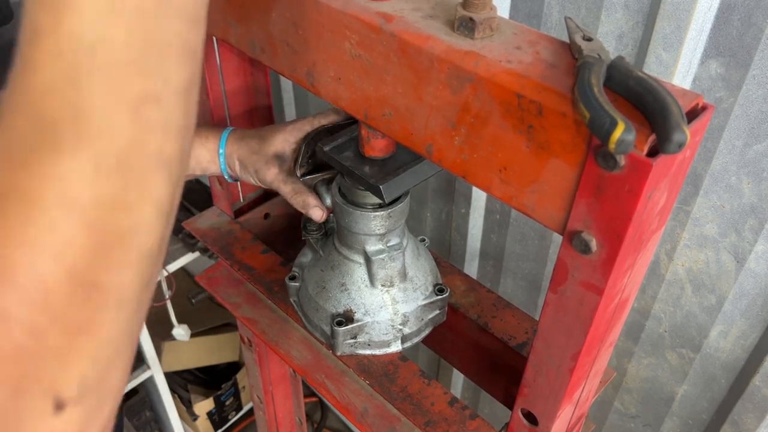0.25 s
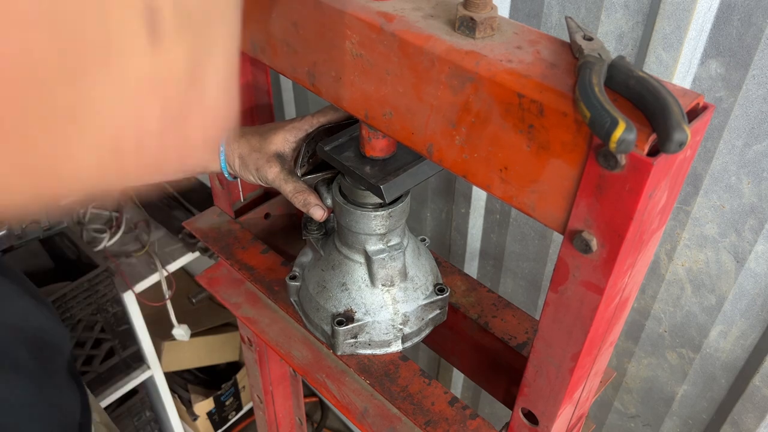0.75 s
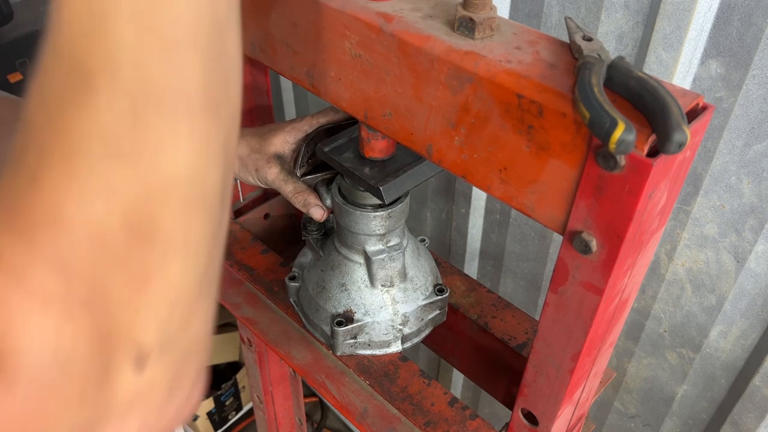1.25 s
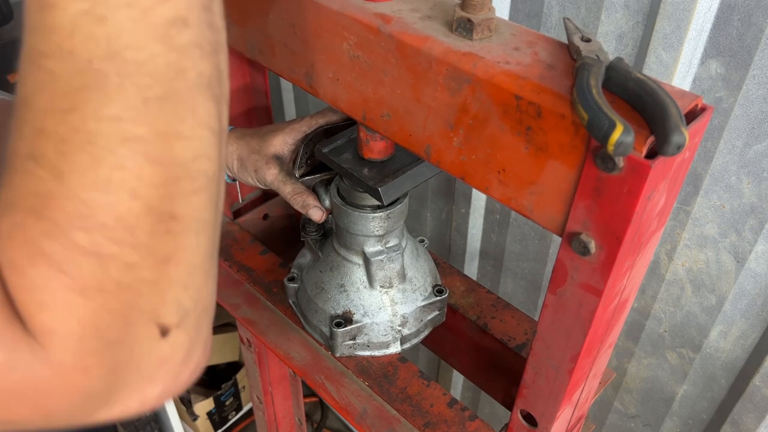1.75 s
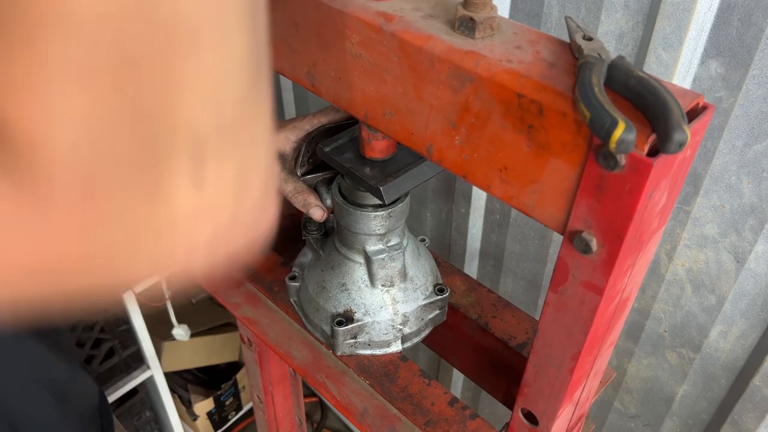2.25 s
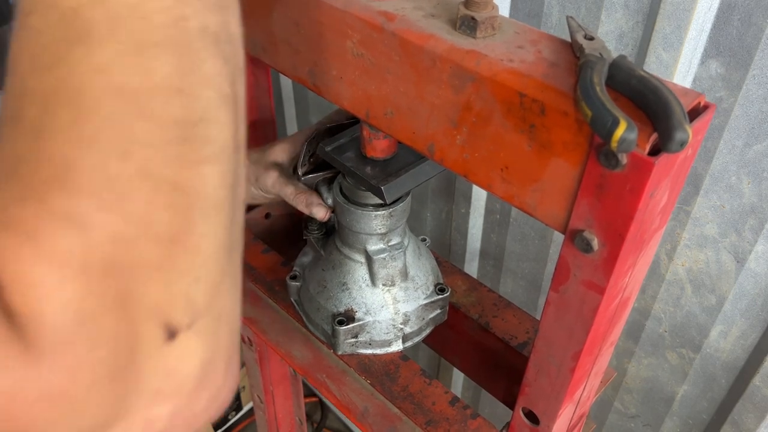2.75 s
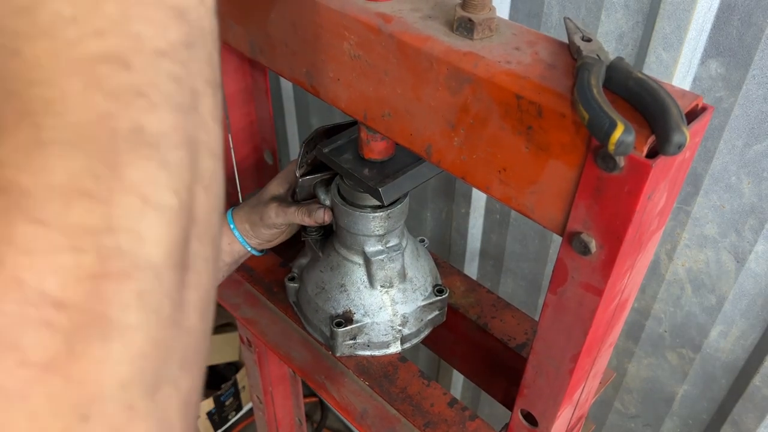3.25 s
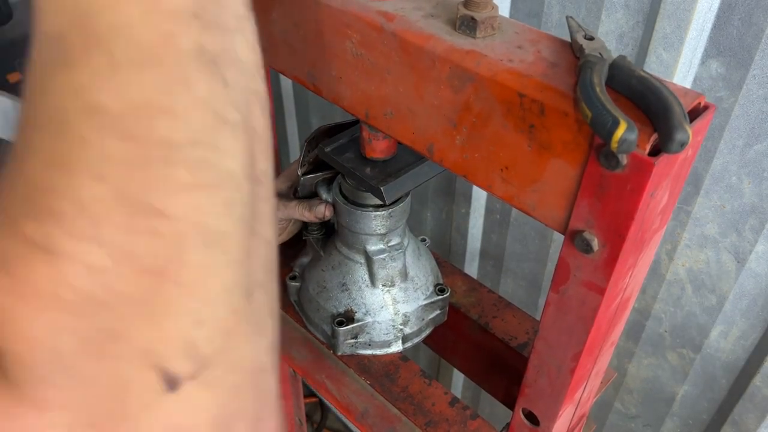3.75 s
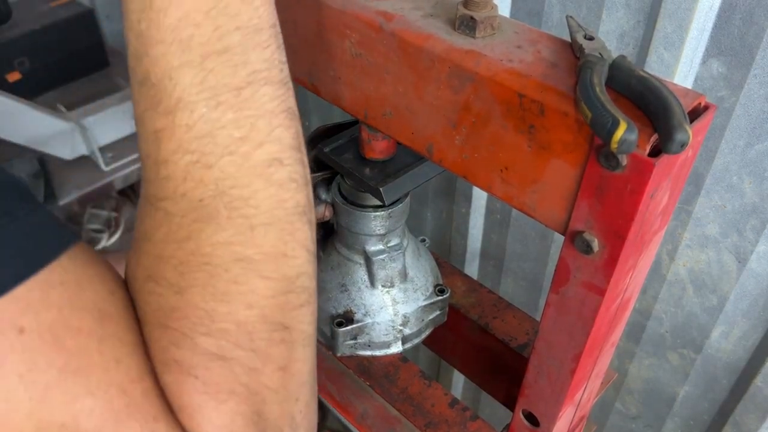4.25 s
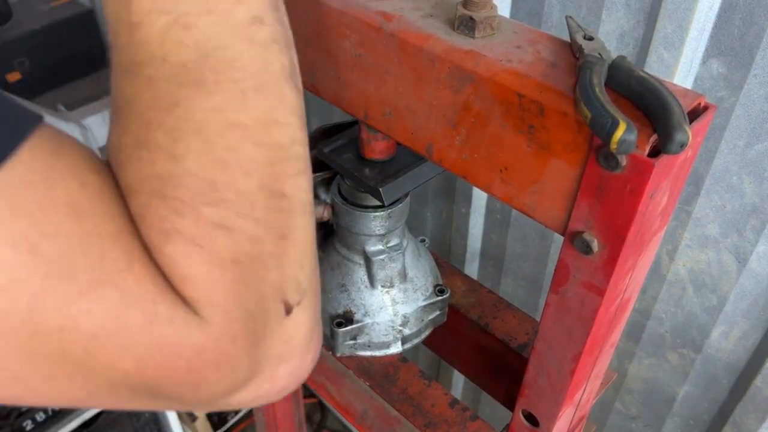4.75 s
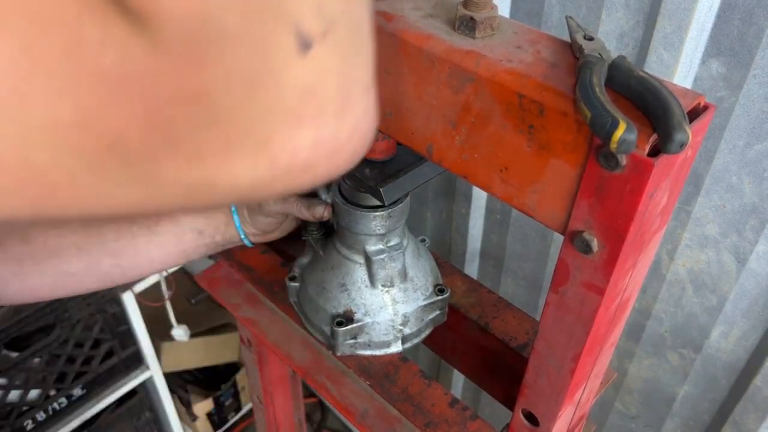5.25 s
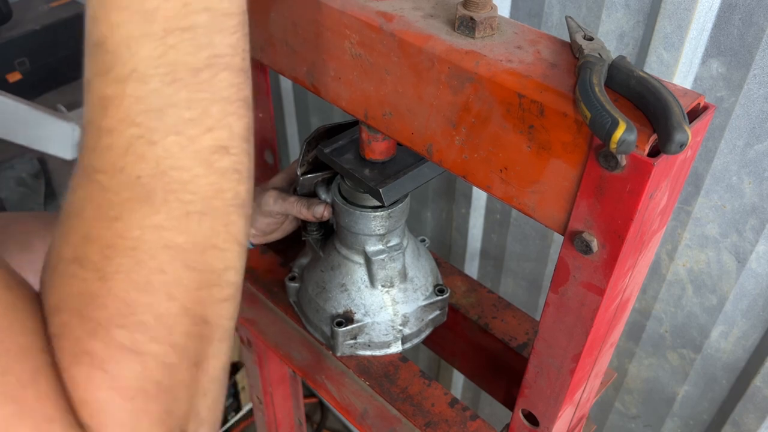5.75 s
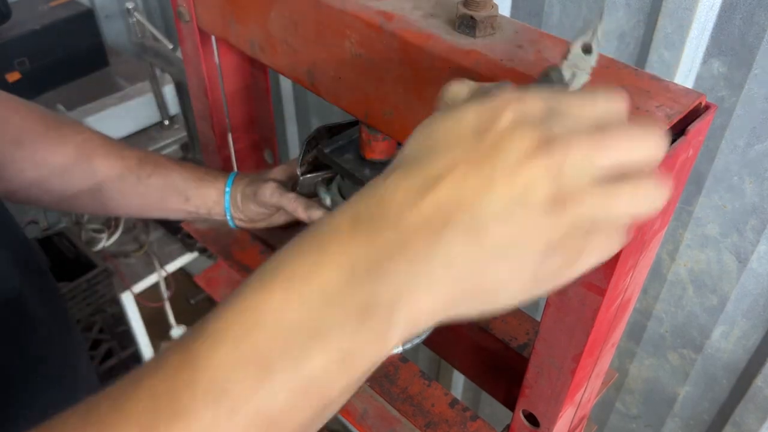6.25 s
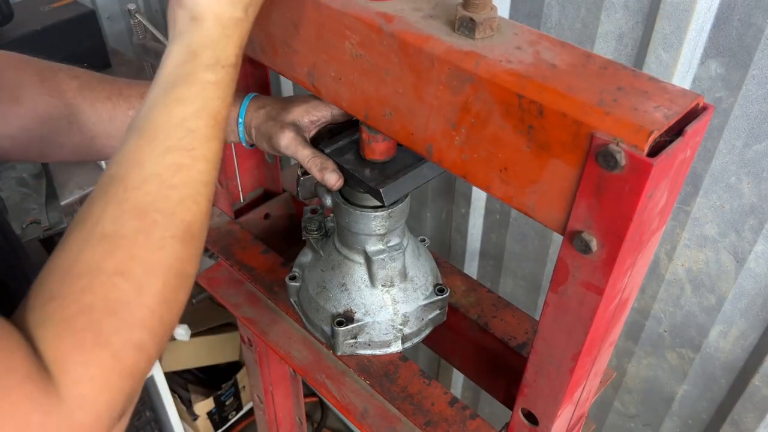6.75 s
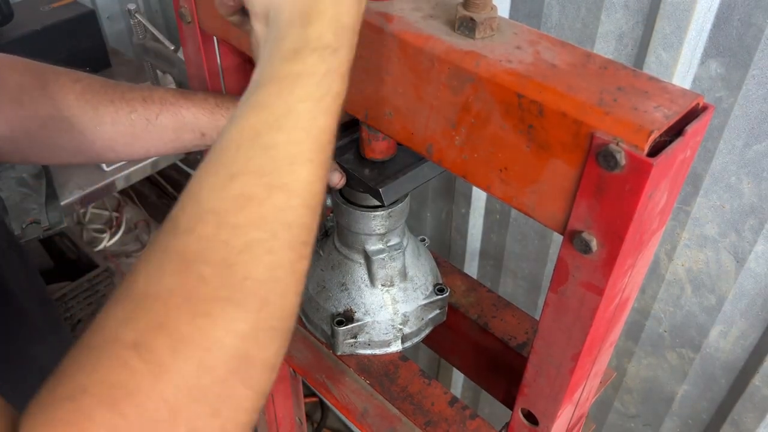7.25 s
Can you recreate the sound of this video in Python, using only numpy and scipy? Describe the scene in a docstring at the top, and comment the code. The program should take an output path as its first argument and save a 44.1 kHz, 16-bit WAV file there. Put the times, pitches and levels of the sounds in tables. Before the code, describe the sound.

Close stereo microphone in a small sheet-metal workshop. A loose steel handle clacks, chatters and gives tiny high squeaks about once a second as a hydraulic press is pumped. The first three strokes are crisp and loud; later ones are softer and drier. Faint valve ticks come before strokes. After six seconds only light brushes remain, the low hum swells, pliers skid with a short squeal, and dull blows hit a bench.

```python
"""Hand-pumped press in a workshop

A hand-pumped hydraulic press, close by in a sheet-metal workshop, makes about one stroke a second.
The valve ticks and the loose steel handle squeaks, chatters and knocks, over a low distant hum.
Near the end the hum grows, pliers skid on steel with a short squeal and something heavy thuds.
Contacts are shaped noise with ringing modes, squeaks are unsteady tones; a two-port microphone listens."""
import sys
import numpy as np
from scipy import signal
from scipy.fft import rfft, irfft, next_fast_len
from scipy.io import wavfile
from scipy.ndimage import map_coordinates

SR = 44100
rng = np.random.default_rng(int(sys.argv[2]) if len(sys.argv) > 2 else 0)


def unload_audio(sound):
    """Save the sound as a 16-bit wav file, at the path given as the first command line argument."""
    columns = np.transpose(np.atleast_2d(sound))
    # keep every value between -1 and 1, then stretch to whole-number steps
    steps = np.round(np.clip(columns, -1, 1) * 32767)
    wavfile.write(sys.argv[1], SR, steps.astype(np.int16))


N = 331191

# Levels are relative: each source below adds its own trim in dB.
# The loose handle strikes and chatters in its socket. Each row: start in seconds, contact length in
# seconds, level in dB, treble in dB, pitch of its squeak in Hz (0 for none).
HANDLE_CONTACTS = [(0.466, 0.026, -16, 2, 11239), (0.515, 0.0091, -19, -4, 0),
                   (0.7561, 0.015, -22, 0, 5865), (.775, 0.023, -23.5, -5, 5860),
                   (1.2539, 0.026, -20.5, -.5, 9050), (1.303, 0.02, -17.5, -6.5, 0),
                   (1.4168, 0.0078, -16, -8, 0), (1.538, 0.0042, -34.5, -5, 9260),
                   (1.573, 0.016, -25, -2.5, 0), (1.598, .004, -24, 9, 11460), (2.186, 0.0033, -37, -10, 0),
                   (2.2006, 0.026, -21, 5, 11339), (2.2355, 0.0029, -23, -8.5, 0),
                   (2.2438, 0.0052, -20.5, -5, 0), (2.421, 0.0067, -39.5, -6.5, 0),
                   (2.457, 0.0046, -38.5, -13.5, 0), (2.5005, 0.025, -30.5, 4.5, 11296),
                   (3.577, .033, -25, -2, 0), (3.717, 0.022, -29.5, 3.5, 11353.5),
                   (4.455, 0.036, -25.5, -2.5, 11428.5), (4.582, 0.029, -32.5, -2.5, 0),
                   (5.17, 0.043, -22.5, -4, 9182), (5.27, 0.014, -27, 2.5, 9239),
                   (5.307, 0.031, -32.5, -1.5, 0), (5.875, 0.1, -55, -13, 0), (5.935, 0.033, -44, -17, 0),
                   (5.964, .023, -36.5, -3, 0), (5.989, 0.047, -23.5, -6, 9163),
                   (6.153, 0.034, -44.5, -16, 0)]
# The handle meets its stop and shakes the frame; the pump valve ticks as the stroke turns; hands and
# tools brush lightly against the press; pliers skid over steel; dull blows land on a bench.
# Each row: start in seconds, length in seconds, level in dB, treble in dB.
KNOCKS = [(0, .02, -26.5, 1), (.8118, .002, -15, 9), (.819, 0.023, -33.5, 1), (1.606, 0.016, -33.5, 1),
          (1.628, 0.015, -24.5, -5.5), (2.529, 0.0078, -35.5, 2.5), (2.5695, 0.0017, -28, -6),
          (2.587, 0.0046, -31, -48), (3.762, 0.028, -44, -23), (4.615, 0.029, -43, -28),
          (5.34, 0.013, -36, -18)]
VALVE_TICKS = [(.398, 0.014, -43.5, 6), (1.161, .02, -44, -5), (2.025, 0.011, -46.5, 1),
               (2.161, .005, -51, -0.5), (3.485, 0.027, -47.5, 0.5), (4.362, 0.013, -49.5, -0.5),
               (5.094, 0.016, -47.5, -2.5), (5.765, 0.0092, -50.5, -3.5)]
BRUSHES = [(6.29, 0.035, -64, 4), (6.405, 0.033, -67.5, 2), (6.575, 0.035, -51, -2.5),
           (6.69, 0.069, -67, -15), (6.83, .02, -69.5, -4), (7.028, .005, -61.5, -1.5)]
PLIERS_SKIDS = [(7.09, 0.029, -23.5, 1.5), (7.116, 0.033, -25, -4)]
THUDS = [(7.351, 0.025, -42, 2.5), (7.447, 0.013, -23.5, -4)]
# Broad colour of each object. Each row: frequency in Hz, relative level in dB per Hz.
HANDLE_BODY = [(80, -29), (300, -13.5), (460, -8), (650, -10.5), (1100, -4.5), (2200, -1.5), (5000, -1),
               (6600, -6.5), (7800, -3.5), (10000, -3.5), (12500, -2.5), (15500, -2.5)]
FRAME_BODY = [(60, -23.5), (250, -9.5), (550, -2.5), (1000, -2.5), (1900, -2.5), (3300, -4), (5800, -4),
              (8000, -4.5), (12000, -16.5), (15500, -20.5)]
VALVE_BODY = [(60, -6), (150, -9), (400, -13), (750, -5), (1200, -12), (2500, -12.5), (5000, -20),
              (8500, -24.5), (15000, -38.5)]
BRUSH_BODY = [(200, -3), (900, -1), (2500, 2), (4500, -5), (7000, -3), (11000, -5), (15000, 1)]
PLIERS_BODY = [(150, -31), (800, -5.5), (1600, -1), (3500, 6.5), (4600, -3.5), (6500, 1.5), (10000, 2),
               (15500, 2.5)]
BENCH_BODY = [(80, -40), (450, -13), (900, 0.5), (1700, -2), (2600, -10), (3400, -19), (5000, -30),
              (8000, -41), (15000, -52)]
# Resonances of each object. Each row: frequency in Hz, width in Hz, mean lift in dB.
HANDLE_PEAKS = [(897, 49, 9), (1660, 150, 1.5), (2390, 120, 8), (3010, 200, 5.5), (4650, 340, 0.5),
                (6000, 250, 7), (6500, 224, 10.5), (9105, 450, 12.5), (11310, 720, 15.5), (13100, 690, 6.5),
                (13900, 900, 2.5), (15650, 250, 0.5)]
FRAME_PEAKS = [(598.4, 120, 2), (855, 18, 19), (1330, 58, 0.71), (1782, 550, 5.2), (2380, 100, 9),
               (4300, 200, 1.9), (5736, 110, 2), (6700, 770, 3.435), (11350, 350, 7.7)]
VALVE_PEAKS = [(880, 67, 3.7), (1830, 150, 11), (4220, 240, 10)]
BRUSH_PEAKS = [(4040, 290, 12.5)]
PLIERS_PEAKS = [(534, 49, 21.7), (2377, 80, 12.7), (2860, 130, 6.2), (3730, 160, 10), (5200, 41, 15),
                (5700, 120, 5.4), (6760, 200, 6.1), (8450, 330, 8.5), (14200, 210, 8.4)]
BENCH_PEAKS = [(925, 98, 7), (1590, 180, 4.8), (2780, 97, 9.6)]
# Modes that ring on after a contact. Each row: frequency in Hz, relative level in dB, t60 in seconds
# before the manner of contact shortens it.
HANDLE_RING = [(861, -24.5, 0.43), (1160, -30, 0.85), (1363, -27, 0.36), (2360, -29, .4), (2804, -28, 0.79),
               (3130, -27.5, .29), (5150, -28.5, 0.22), (5822, -25, 0.3), (5929, -26, .5),
               (6432, -24.5, 0.36), (11347, -23, .3), (13309, -22.5, 0.18), (14300, -30.5, 0.42)]
FRAME_RING = [(618, -23.5, 0.87), (853, -18.5, 0.29), (892, -26.5, 1.8), (1175, -32, 1.8),
              (1370, -39.5, 1.2), (1464, -33.5, 2.1), (1770, -32, 2.8), (2270, -21.5, 0.27),
              (5822, -23, .5)]
VALVE_RING = [(880, -14.5, .3), (1848, -15, .25), (4190, -23, .3)]
PLIERS_RING = [(2400, -12, 0.31), (2945, -16, 0.37), (3710, -14, 0.24), (5350, -17, 0.56), (5642, -17, .35),
               (5800, -17, 0.5), (6620, -8, 0.2), (8360, -24, 0.46)]
BENCH_RING = [(939, -7.5, 0.54), (2714, -3.5, 0.19)]
# The pliers stick and slip in three short overlapping squeals, each with its own pitch. Each row: start
# in seconds, length in seconds, pitch in Hz, glide in octaves, level in dB.
PLIERS_SQUEAKS = [(7.088, 0.0503, 2422, -0.164, -27.5), (7.101, 0.032, 5350, -0.000045, -33),
                  (7.124, 0.036, 2820, .09, -32.5)]
# The frame rocks under a stroke. Each row: start in seconds, length in seconds, level in dB.
ROCKING = [(0.447, 0.11, -50), (.78, 0.16, -56), (1.17, .12, -55.5), (2.579, 0.19, -47.5),
           (3.49, 0.13, -48), (3.761, 0.14, -54), (4.382, 0.12, -43.5), (5.091, 0.096, -55)]
# The loaded frame groans on one low mode. Each row: start in seconds, pitch in Hz, level in dB.
GROANS = [(1.637, 622.5, -34.5), (2.53, 878, -40), (4.475, 877, -42), (4.61, 888, -45), (5.275, 888, -44.5),
          (5.342, 882, -47.5)]
# Partials of the distant hum. Each row: mean frequency in Hz, relative level in dB.
HUM = [(58.5, -60.5), (120, -54.5), (186.5, -55), (254, -65), (365, -75)]
# Background levels before trims. Each row: time in seconds, hum in dB, air in dB.
AMBIENCE = [(0, -54, -65.5), (3.11, -52.5, -62.5), (3.16, -55.5, -73), (6.55, -55, -68), (6.8, -46, -66),
            (7.51, -46, -63)]
# Colours of the rumble that swells with the hum, of the deep steady rumble of the building and of the
# air noise. Each row: frequency in Hz, relative level in dB per Hz.
RUMBLE = [(13, -67.5), (45, -25.5), (86, -9.5), (117, 1), (156, -6), (188, 0.5), (222, -6.5), (500, -22.5),
          (650, -53.5), (1100, -120)]
DEEP = [(13, -45.5), (22, -21.5), (38, -7.5), (55, 0.5), (80, -4), (130, -29.5), (400, -88)]
AIR = [(200, -4.5), (420, 0), (620, 3.5), (900, -4.5), (1700, -9.5), (2600, -22), (6000, -27.5),
       (10000, -30.5), (13000, -24), (16000, -35)]
# Decay of the workshop before shortening. Each row: frequency in Hz, t60 in seconds.
WORKSHOP = [(150, 0.56), (700, 0.71), (2000, 0.62), (6000, 0.74), (9000, 0.47), (12000, 0.44),
            (15000, 0.45)]
# Left-right likeness at full focus. Each row: frequency in Hz, correlation from 0 to 1.
ALIKE = [(60, 0.44), (250, .9), (800, 0.45), (2500, 0.35), (6000, 0.32), (8500, 0.739), (10500, 1),
         (12500, .93), (15000, .88)]
# Colour difference of the microphone ports. Each row: frequency in Hz, left minus right in dB.
BALANCE = [(130, -1.5), (300, 3), (800, -1), (2500, 1), (4500, 5), (6000, 7), (8500, 0.5), (15000, -0.5)]
# Phase by which the left port leads. Each row: frequency in Hz, phase in radians.
LEAD = [(1500, 0), (3000, .5), (6000, -1), (9200, -2.6), (10200, -3.15), (11400, -4.35), (12400, -5.6),
        (13700, -6.5), (16000, -7.1)]
# For a few strokes the hits swell in more softly, sound drier and less focused: from and to, in seconds.
SOFT_SPAN = (3.14, 6.8)
# Contacts outside and inside that span. Each row: rise as a share of the length, bass in dB, room in dB,
# share of the decay time, focus of the image from 0 to 1.
CRISP = (0.18, 0, -5, 0.8759, 0.99)
SOFT = (0.33, 3.5, -7, 0.34, 0.09)

TOP_HZ = 16000  # band limit of the microphone
MEDIUM_DB, DULLING = -29.5, 0.26  # dB of bass gained for each dB that a contact is weaker than medium
GROAN_S = 0.04  # length of every groan


def amp(db):
    """Decibels to gain."""
    return 10 ** (np.asarray(db) / 20)


def unit(x):
    """Scale to rms 1."""
    return x / np.sqrt(np.mean(x ** 2) + 1e-20)


def along(points, hz):
    """(Hz, value) points joined on a log frequency axis."""
    f, v = np.transpose(points)
    return np.interp(np.log(hz + 1), np.log(f + 1), v)


def curves(rows, t):
    """Each column after the time, read at the times t."""
    s, *cols = np.transpose(rows)
    return [np.interp(t, s, c) for c in cols]


def wobble(rate):
    """A smooth random curve, rate knots a second."""
    knots = rng.standard_normal(int(N * rate / SR) + 4)
    return map_coordinates(knots, [np.arange(N) * rate / SR])


def filtered(x, response):
    """x times a response of frequency."""
    n = x.shape[-1]
    m = next_fast_len(n + 4096)
    return irfft(rfft(x, m) * response(np.fft.rfftfreq(m, 1 / SR)), m)[..., :n]


def stereo_noise(n, colour_db, focus):
    """Coloured noise of rms 1, partly alike in the two channels."""
    hz = np.fft.rfftfreq(n, 1 / SR)
    # the cosine of twice this angle is the left-right correlation
    turn = np.arccos(np.clip(focus * along(ALIKE, hz), 0, 1)) / 2
    spectra = rfft(rng.standard_normal((2, n))) * amp(colour_db(hz))
    mid, side = spectra * [np.cos(turn), np.sin(turn)]
    return unit(irfft([mid + side, mid - side], n))


def manner(s):
    """How a contact at time s sounds: crisp or soft."""
    return SOFT if SOFT_SPAN[0] < s < SOFT_SPAN[1] else CRISP


def room_tail(decay_share, focus, build_s=.003, panel_db=3, panel_hz=60):
    """A fresh diffuse answer, left energy 1; the sheet-metal walls favour many narrow pitches."""
    def panels(hz):
        lifts = rng.standard_normal(1024)
        return panel_db * map_coordinates(lifts, [hz / panel_hz], order=1, mode="wrap")

    hz, t, z = signal.stft(stereo_noise(SR, panels, focus), SR, nperseg=256)
    t60 = decay_share * along(WORKSHOP, hz)[:, None]
    tail = signal.istft(z * amp(-60 * t / t60), SR, nperseg=256)[1]
    tail = tail * (1 - np.exp(-np.arange(tail.shape[1]) / SR / build_s))
    return tail / np.linalg.norm(tail[0])


def add(out, s, sound, room_db):
    """Lay a stereo sound and the room's answer into the track at time s."""
    *_, decay_share, focus = manner(s)
    # the left channel alone wakes the room
    heard = amp(room_db) * signal.fftconvolve(sound[:1], room_tail(decay_share, focus), axes=1)
    heard[:, :sound.shape[1]] += sound
    start = max(round(s * SR), 0)
    out[:, start:start + heard.shape[1]] += heard[:, :N - start]


def chatter(t, rise, length, t60, rough_db, sag_db=3, rebound_hz=350, top_db=5, strike_db=5, strike_s=0.0015):
    """Force of one contact: a first strike, quick uneven rebounds that weaken, then the release."""
    rebounds = map_coordinates(rng.standard_normal(1024), [t * rebound_hz], order=1, mode="wrap")
    rebound_db = np.minimum(rough_db * rebounds, top_db)
    first_db = strike_db * np.exp(-t / strike_s)
    fall_db = sag_db * np.minimum(t / length, 1) + 60 * np.maximum(t - length, 0) / t60
    grip = np.minimum(t / max(rise, 1e-4), 1) ** 2
    return grip * amp(first_db + rebound_db - fall_db)


def contacts(rows, body, peaks, ring, rise_s, t60, rough_db, ring_db, room_db, scatter_db=2, linger=4):
    """Each contact shakes an object's dense resonances, leaves any modes ringing and wakes the room."""
    out, t = np.zeros((2, N)), np.arange(SR * 3 // 4) / SR
    for s, length, db, treble_db, *_ in rows:
        length = max(length, .002)
        rise_share, bass_db, wet_db, decay_share, focus = manner(s)
        rise = abs(rise_s + rise_share * length)
        # the point of contact shifts, so each resonance speaks with a new strength
        lifts = rng.normal(0, scatter_db, len(peaks))
        weak_bass_db = bass_db + DULLING * (MEDIUM_DB - db)
        hardness = [(900, weak_bass_db), (2200, 0), (6000, 0.0076), (10000, treble_db)]

        def colour_db(hz):
            resonance = sum((lift + shift) / (1 + (2 * (hz - f) / width) ** 2)
                            for (f, width, lift), shift in zip(peaks, lifts))
            return along(body, hz) + resonance + along(hardness, hz)

        shake = stereo_noise(len(t), colour_db, focus)
        # a contact that builds slowly also lets go slowly
        hit = shake * chatter(t, rise, length, t60 + linger * rise, rough_db)
        # rms 1 over the contact and 4 ms after it
        hit = hit / np.sqrt(np.mean(hit[:, :round((length + .004) * SR)] ** 2))
        swell = 1 - np.exp(-t / (rise + length / 2))
        for hz, level, life in ring:
            mode_db = ring_db + level + along(hardness, hz) + rng.normal(0, scatter_db)
            fade = amp(mode_db - 60 * t / (life * decay_share))
            hit = hit + swell * fade * np.sin(2 * np.pi * (hz * t + rng.random()))
        add(out, s, amp(db) * hit, wet_db + room_db)
    return out


def arch(t, length):
    """A half-sine swell that lasts for length seconds."""
    return np.sin(np.pi * np.clip(t / length, 0, 1))


def squeaks(rows, jitter_hz, room_db, slip_hz=700, overtone_db=-15):
    """Brief unsteady tones of steel rubbing on steel: start, length, pitch, glide, level a row."""
    out, t = np.zeros((2, N)), np.arange(SR // 16) / SR
    for s, length, hz, glide, db in rows:
        jitter = jitter_hz * map_coordinates(rng.standard_normal(256), [t * slip_hz], mode="wrap")
        pitch = hz * 2 ** (glide * np.minimum(t / length, 1)) + jitter
        phase = 2 * np.pi * np.cumsum(pitch) / SR
        overtones = sum(np.sin(k * phase) for k in range(2, 5) if k * hz < TOP_HZ)
        tone = np.sin(phase) + amp(overtone_db) * overtones
        squeak = amp(db) * np.sqrt(2) * arch(t, length) * tone
        add(out, s, np.tile(squeak, (2, 1)), room_db)
    return out


def ambience():
    """A wavering hum of distant machinery over rumble and faint air noise."""
    hum_db, air_db = curves(AMBIENCE, np.arange(N) / SR)
    hum = 0
    for hz, db in HUM:
        level = amp(db + 3.8 * wobble(6))
        hum = hum + level * np.sin(2 * np.pi * np.cumsum(hz + 1.6 * wobble(7.1)) / SR)
    rumble = stereo_noise(N, lambda hz: along(RUMBLE, hz), focus=0.42)
    air = stereo_noise(N, lambda hz: along(AIR, hz), focus=0.19)
    deep = stereo_noise(N, lambda hz: along(DEEP, hz), focus=0.94)
    machinery = amp(hum_db) * (amp(-3.0) * unit(hum) + amp(-3.5) * rumble)
    return amp(-66) * deep + machinery + amp(air_db + 2.5) * air


def frame_knocks():
    """The handle meets its stop, and the frame shakes and rings."""
    return amp(-2) * contacts(KNOCKS, FRAME_BODY, FRAME_PEAKS, FRAME_RING, rise_s=0.0004, t60=0.14,
                              rough_db=1.9, ring_db=-7, room_db=-2.0)


def valve_ticks():
    """The pump valve ticks as the stroke turns: faint, rough contacts with three ringing modes."""
    return amp(-1.5) * contacts(VALVE_TICKS, VALVE_BODY, VALVE_PEAKS, VALVE_RING, rise_s=0.0015, t60=0.13,
                                rough_db=5.0, ring_db=0.0, room_db=3.5)


def rocking():
    """Soft low thumps of swelling noise as the frame takes the load."""
    t = np.arange(N) / SR
    push = sum(amp(db) * arch(t - s, length) for s, length, db in ROCKING)
    colour = [(20, -18.0), (55, 1.5), (80, -6), (160, -9.5), (500, -49), (2000, -100)]  # Hz, dB per Hz
    return push * stereo_noise(N, lambda hz: along(colour, hz), focus=0.84)


def handle_chatter():
    """The loose steel handle strikes and rebounds in its socket."""
    return amp(-2.0) * contacts(HANDLE_CONTACTS, HANDLE_BODY, HANDLE_PEAKS, HANDLE_RING, rise_s=0.00066,
                                t60=.025, rough_db=0.5, ring_db=1.5, room_db=-0.3)


def handle_squeaks(delay_s=0.00088, length_share=0.65, over_db=2.5, short_s=0.022, long_loss_db=2.5):
    """While the handle slides, one steel mode sings; it is weaker for each doubling of the contact's length."""
    rows = []
    for s, length, db, _, hz in HANDLE_CONTACTS:
        if hz > 20:
            level_db = db + over_db - long_loss_db * np.log2(length / short_s)
            rows.append((s + delay_s, length_share * length, hz, 0, level_db))
    return squeaks(rows, jitter_hz=80, room_db=-8.5)


def groans():
    """The loaded frame groans: short unsteady tones, each on one low mode."""
    rows = [(s, GROAN_S, hz, 0, db) for s, hz, db in GROANS]
    return squeaks(rows, jitter_hz=49.5, room_db=-7.5)


def brushes():
    """Faint rubbing of hands and tools that leaves no mode ringing."""
    return contacts(BRUSHES, BRUSH_BODY, BRUSH_PEAKS, [], rise_s=0.002, t60=0.091,
                    rough_db=5, ring_db=0, room_db=2.5)


def pliers():
    """The pliers skid and ring on steel, and squeal as they stick and slip."""
    skids = contacts(PLIERS_SKIDS, PLIERS_BODY, PLIERS_PEAKS, PLIERS_RING, rise_s=0.0021, t60=0.06,
                     rough_db=0.5, ring_db=2.5, room_db=-0.7)
    return amp(-3.0) * skids + squeaks(PLIERS_SQUEAKS, jitter_hz=70, room_db=-12.5)


def bench_thuds():
    """Two dull blows shake a bench and leave two modes ringing."""
    return amp(-1.0) * contacts(THUDS, BENCH_BODY, BENCH_PEAKS, BENCH_RING, rise_s=.0008, t60=0.17,
                                rough_db=-0.5, ring_db=6.5, room_db=-2.0)


def scene():
    """The press, the handling, the bench and the workshop around them."""
    press = frame_knocks() + valve_ticks() + rocking() + handle_chatter() + handle_squeaks() + groans()
    return ambience() + press + brushes() + pliers() + bench_thuds()


def record(dry):
    """The two microphone ports differ in colour and phase; both fade out around the band limit."""
    def ports(hz):
        gain = amp(np.outer([.5, -.5], along(BALANCE, hz)))
        return gain * np.exp(1j * np.outer([.5, -.5], along(LEAD, hz)))

    def low_pass(hz):
        return np.clip((TOP_HZ - hz) / 400 + .5, 0, 1) ** 2

    return filtered(dry, lambda hz: ports(hz) * low_pass(hz))


dry = scene()
out = record(dry)
unload_audio(out)
```